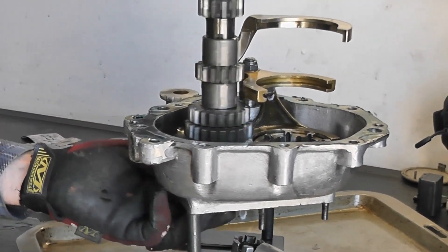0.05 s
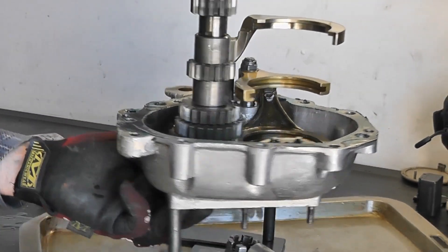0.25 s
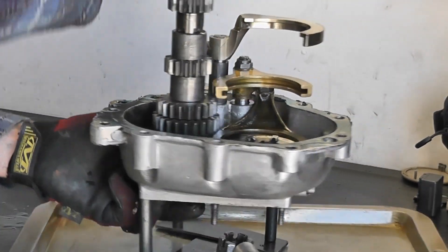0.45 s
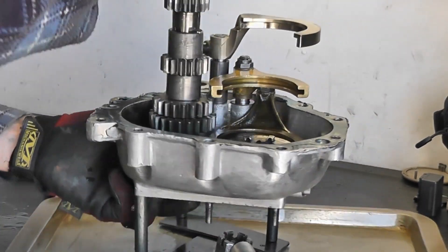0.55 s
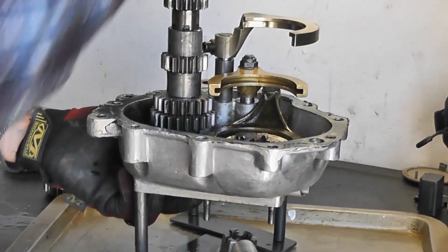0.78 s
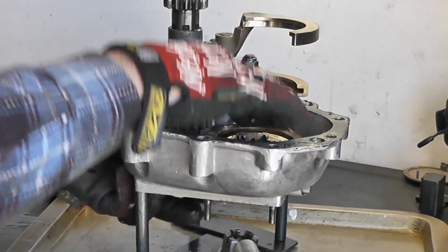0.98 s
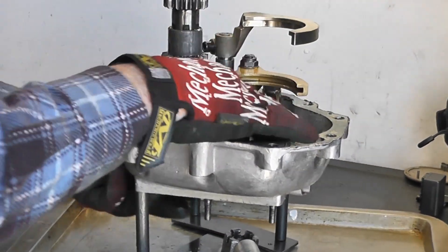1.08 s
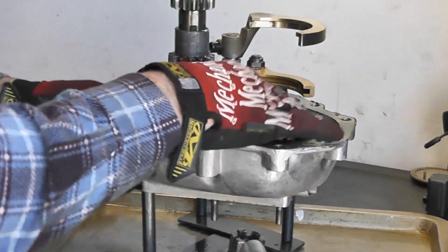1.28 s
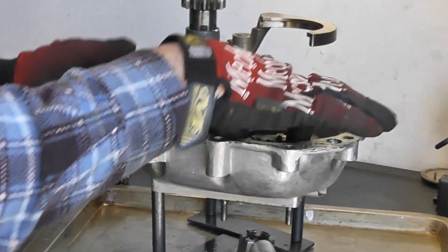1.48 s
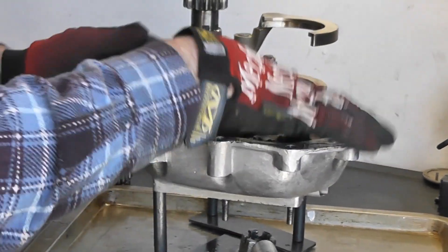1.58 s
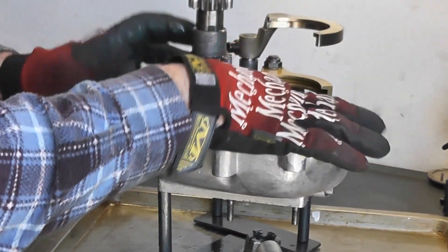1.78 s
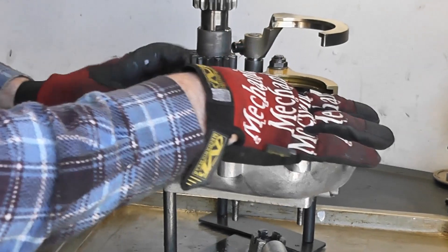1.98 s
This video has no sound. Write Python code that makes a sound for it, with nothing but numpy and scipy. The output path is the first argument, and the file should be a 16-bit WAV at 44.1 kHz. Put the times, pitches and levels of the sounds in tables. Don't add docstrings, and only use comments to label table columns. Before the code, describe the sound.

A steel gear scrapes along its shaft and knocks inside a hollow metal casing, then rattles

```python
import sys
import numpy as np
from scipy import signal
from scipy.fft import rfft, irfft
from scipy.io import wavfile

SR = 44100
rng = np.random.default_rng(int(sys.argv[2]) if len(sys.argv) > 2 else 0)


def boost(x):
    u = np.asarray(x, float) / 20
    return 10 ** u


def transcribe(signal):
    frames = np.atleast_2d(signal).T
    limited = np.clip(frames, -1, 1)
    pcm = np.round(limited * 32767).astype(np.int16)
    wavfile.write(sys.argv[1], SR, pcm)


N = 90404

# pitch_hz [Hz], level_db [dB], t60_s [s]
CASING_MODES = [(1017, 2, .12), (1120, 2, .12), (1162, -2, .09), (1295, -3, .07), (1432, 2, .08),
                (1740, 3, .07), (1785, 2, .06), (1968, 3, .05), (2015, 2, .05), (2085, -3, .05),
                (2180, -3, .05), (2452, -4, .05)]
# pitch_hz [Hz], level_db [dB], t60_s [s]
HELD_RIM_MODES = [(7576, 0, .048), (7620, -34, .15), (12280, -34, .14), (14230, -18, .07)]
# pitch_hz [Hz], level_db [dB], t60_s [s]
SEATED_RIM_MODES = [(7682, -9, .36), (7720, 0, .08), (7640, -4, .1), (8366, -16, .1), (12350, -20, 0.045),
                    (14330, -18, .05)]


def rms_one(x):
    return x / np.sqrt(np.mean(x ** 2) + 1e-20)


def butterworth(x, order, hz, kind="low"):
    return signal.sosfilt(signal.butter(order, hz, kind, fs=SR, output="sos"), x)


def at_hz(points, hz):
    point_hz, point_db = np.array(points).T
    return np.interp(np.log(hz), np.log(point_hz), point_db)


def colour(x, points):
    hz = np.maximum(np.arange(N // 2 + 1) * SR / N, 1)
    return irfft(rfft(x) * boost(at_hz(points, hz)), N)


def drift(hz):
    return rms_one(butterworth(rng.standard_normal(N + SR), 2, hz)[SR:])


def add(out, start_s, x):
    i = int(start_s * SR)
    out[i:i + len(x)] += x[:len(out) - i]


def ringing(modes, spread_db=0.):
    hz, db, t60 = np.transpose(modes)[:, :, None]
    t = np.arange(int(SR * np.clip(t60.max(), .02, .4))) / SR
    level = boost(db + spread_db * rng.standard_normal(hz.shape))
    decay = boost(-60 * t / np.maximum(t60, .003))
    return np.sum(level * np.sin(2 * np.pi * hz * t) * decay, axis=0)


def crowd(low_hz, high_hz, t60, centre_hz, octaves, skirt_db, count):
    skirt_db_per_octave = -24
    hz = low_hz * (high_hz / low_hz) ** ((np.arange(count) + rng.random(count)) / count)
    away = np.log2(hz / centre_hz)
    skirt = boost(skirt_db + skirt_db_per_octave * np.maximum(away, 0))
    share = np.exp(-.5 * (away / octaves) ** 2) + skirt
    decay_s = t60 * (hz / centre_hz) ** -.4 * rng.uniform(.6, 1.5, count)
    return np.c_[hz, 20 * np.log10(share), decay_s]


def rough_contact():
    contact_s, rise_s, first_touch_db = 0.0047, .0004, 8
    t = np.arange(SR // 50) / SR
    uneven_db = 4.1 * rng.standard_normal(len(t)) + first_touch_db * (t < 2 * rise_s)
    force = rng.standard_normal(len(t)) * np.exp(-t / contact_s)
    return force * boost(uneven_db) * (1 - np.exp(-t / rise_s))


def strike(start_s, level_db, modes, rough):
    if rough:
        x = signal.fftconvolve(rough_contact(), ringing(modes, spread_db=4.5))
    else:
        x = ringing(modes)
        x = x * (1 - np.exp(-np.arange(len(x)) / (0.00031 * SR)))
    out = np.zeros(N)
    add(out, start_s, boost(level_db) * x / np.sqrt(np.mean(x[:SR // 150] ** 2)))
    return out


def knocks(rows, rim):
    body_trim_db = [-13, -6.5, -1]
    clack_trim_db, casing_trim_db, rim_trim_db = body_trim_db
    hollow_db = -1
    out = np.zeros(N)
    for start_s, clack_db, clack_hz, casing_db, rim_db in rows:
        clack = crowd(1502, 15500, .03, clack_hz, 0.36, -15.5, count=90)
        hollow = crowd(850, 2800, .045, 1700, .5, -20, count=45) + [0, hollow_db, 0]
        out += strike(start_s, clack_db + clack_trim_db, clack, True)
        out += strike(start_s, casing_db + casing_trim_db, np.r_[CASING_MODES, hollow], True)
        out += strike(start_s, rim_db + rim_trim_db, rim, False)
    return out


def air():
    # pitch_hz [Hz], level_db [dB]
    hush_spectrum = [(15, -40), (35, -18), (64, -8.5), (100, -3), (486, -6.5), (1010, -13), (2600, -21.5),
                     (15700, -36.5)]
    # pitch_hz [Hz], likeness [0 to 1]
    likeness = [(25, .3), (60, .65), (150, .7), (600, 0.52), (5000, 0.9)]
    hush_db, swell_db = -53.5, .5
    mid, side = colour(rng.standard_normal((2, N)), hush_spectrum)
    share = [(hz, 10 * np.log10((1 - c) / (1 + c))) for hz, c in np.clip(likeness, .01, [SR, .98])]
    stereo = mid + colour(side, share) * [[1], [-1]]
    return boost(hush_db + swell_db * drift(1.3)) * stereo / np.std(mid)


def scrape():
    # start_s [s], level_db [dB], brightness_db [dB], casing_share_db [dB]
    slide = [(0.001, -60, 1, 0.5), (.07, -71, 3.5, -1.5), (0.17, -61, 5.5, 1.5), (.198, -49.5, 2, 1),
             (0.213, -38.5, 12, -5), (.25, -41.5, -0.5, -5), (.3, -37.5, 4, -4.5), (.4, -38.5, 2.5, -1),
             (.47, -45, 5.5, -1.5), (.505, -41, 3, -5), (.56, -46, 4.5, 2), (.68, -53.5, 7, 1),
             (.75, -58, 7.5, -1), (.8, -53, 8, 7.5), (.845, -59.5, 9, 8.5), (.89, -74, -2.5, 5),
             (.94, -72.5, 0.5, 3), (.96, -65.5, 10, 5), (1.06, -77.5, -1, -5)]
    # centre_s [s], half_length_s [s], level_db [dB]
    surges = [
        (.425, .007, 3),
        (.462, .007, 2.5),
        (.507, .006, 7),
        (.523, .004, 3),
        (.547, .009, 4.5),
        (.592, .005, 4),
        (.644, .009, 5),
        (.7, .008, 4),
    ]
    # pitch_hz [Hz], level_db [dB per Hz]
    friction_spectrum = [(200, -17.5), (400, -4), (650, -11.5), (1070, -4), (4570, -10), (6700, -17.5),
                         (10000, -16.5), (11500, -24)]
    # pitch_hz [Hz], width_hz [Hz], level_db [dB]
    resonances = [(1818, 220, -7), (4750, 1200, -1.5), (8190, 1200, -9)]
    grit_per_s, grit_spread_db, judder_db = 9000, 3, 1.2
    modes_db, scrape_db, resonance_gain_db = -11, 3.0, 11.0
    edge_share = 0.38

    s, *columns = np.transpose(slide)
    t = np.arange(N) / SR
    level_db, bright_db, casing_db = [np.interp(t, s, c) for c in columns]
    surge_db = sum(db * np.exp(-.5 * ((t - at) / half) ** 2) for at, half, db in surges)
    gate = np.clip((t - s[0]) * 100, 0, 1) * np.clip((s[-1] - t) / 0.041, 0, 1)

    hits = rng.random(N) < grit_per_s / SR
    size = boost(grit_spread_db * np.minimum(rng.exponential(1, N), 4))
    grit = hits * size * rng.choice([-1, 1], N)
    grit = rms_one(grit) * boost(level_db + judder_db * drift(40)) * gate
    grit_rms = np.sqrt(np.mean(grit ** 2))

    hiss = colour(grit, friction_spectrum)
    for hz, width, db in resonances:
        peak = signal.lfilter(*signal.iirpeak(hz, hz / width, SR), hiss)
        hiss = hiss + boost(db + resonance_gain_db) * peak
    modes = np.r_[CASING_MODES, crowd(2400, 9500, .04, 4600, .3, -12, count=40)]
    rung = signal.fftconvolve(grit, ringing(modes))[:N]
    body = rms_one(hiss) + boost(modes_db) * rms_one(rung)

    low = butterworth(body, 4, 2600)
    mid = butterworth(body, 3, [2600, 6800], "band")
    high = butterworth(body, 4, 6800, "high")
    low_db = casing_db + edge_share * surge_db + judder_db * drift(25)
    high_db = bright_db + edge_share * surge_db + judder_db * drift(24.8)
    return boost(scrape_db) * grit_rms * (boost(surge_db) * mid + boost(low_db) * low + boost(high_db) * high)


def slide_knocks():
    rows = [(0.0755, -36, 3170, -36.5, -71), (0.0955, -40, 3840, -43, -66), (0.1372, -57, 3430, -39.5, -75),
            (0.1505, -39, 4770, -38, -69.5), (0.2085, -24.5, 4080, -53, -55), (0.3598, -12, 4130, -20, -48),
            (0.3654, -20.5, 3740, -26, -34), (0.3811, -18.5, 2440, -30.5, -38),
            (0.3931, -23.5, 4300, -27, -51), (0.4109, -48, 4340, -29.5, -49), (0.7105, -44, 4180, -36, -64),
            (0.7205, -32, 4050, -32, -65), (0.7597, -35, 3030, -31.5, -68), (0.7649, -40, 2500, -31.5, -60),
            (0.7936, -33, 4500, -34, -52.5), (0.9475, -45, 5140, -50.5, -64)]
    return knocks(rows, HELD_RIM_MODES)


def selector_fork():
    # start_s [s], level_db [dB]
    hits = [
        (.078, -51.5),
        (1.2, -60.5),
        (1.219, -47.5),
        (1.24, -38.5),
        (1.563, -60),
    ]
    # pitch_hz [Hz], level_db [dB], t60_s [s]
    fork_modes = [(2880, 0, .045), (2950, -6, .17), (2860, -10, .12), (3510, -3, 0.023), (3704, -10, .08)]
    return sum(strike(start_s, level_db, fork_modes, False) for start_s, level_db in hits)


def single_modes():
    # start_s [s], level_db [dB], pitch_hz [Hz], t60_s [s]
    bump_rows = [
        (.139, -35, 350, 0.13),
        (.155, -35.5, 443, 0.075),
        (.33, -36.5, 269, 0.13),
        (.72, -36.5, 514, 0.078),
        (1.562, -36.5, 641.5, 0.07),
        (1.566, -34.5, 507, 0.082),
        (.98, -42, 497, 0.075),
    ]
    # start_s [s], level_db [dB], pitch_hz [Hz], t60_s [s]
    part_rows = [(.368, -28.5, 1120, 0.13), (.383, -29, 1100, 0.11), (.7605, -29, 1985, 0.046),
                 (0.83, -34, 2068, .035), (1.2188, -22.5, 3270, .022), (2.0115, -30.5, 1020, 0.092),
                 (.2645, -23.5, 1800, 0.041), (.3605, -21.5, 1985, 0.033), (.381, -27, 2000, 0.03),
                 (1.2195, -32, 1700, 0.042), (1.561, -34.5, 3540, 0.028), (.202, -35.5, 1600, 0.027),
                 (.152, -45, 4500, 0.059),
                 (0.27, -13.5, 8700, .009), (0.264, -15, 9000, 0.011), (0.36, -20.5, 4090, 0.035),
                 (0.37, -30.5, 4260, 0.059), (0.37, -26, 1380, 0.055), (0.36, -19.5, 1830, 0.032),
                 (.795, -39.5, 7850, 0.075), (.795, -40, 7200, .03), (0.79, -32, 2880, .02),
                 (1.1, -56, 10800, .005), (.796, -48, 13000, .03), (.14, -41.5, 1000, 0.054),
                 (1.351, -50.5, 9400, 0.046), (1.351, -39.5, 3700, 0.037), (1.36, -36, 1700, .05),
                 (1.816, -50.5, 9970, 0.067), (1.836, -46, 6830, 0.091), (2.012, -38.5, 2476, .04),
                 (2.016, -43, 1793, 0.08), (.69, -49, 6200, 0.12), (0.62, -46, 4300, .04)]
    out = np.zeros(N)
    for start_s, level_db, hz, t60 in bump_rows + part_rows:
        x = ringing([(hz, 0, t60)])
        rise = 1 - np.exp(-np.arange(len(x)) * hz / SR)
        add(out, start_s, boost(level_db) * x * rise)
    return out


def shoulder_stop():
    rows = [
        (0.2643, -17, 8900, -40.5, -53.5),
        (0.2659, -15.5, 5010, -39, -13.5),
    ]
    return knocks(rows, HELD_RIM_MODES)


def rubs():
    rows = [
        (0.336, 0.019, -34),
        (1.249, 0.014, -31),
        (1.274, 0.015, -41.5),
        (1.292, 0.031, -42),
        (1.327, 0.0086, -42),
        (1.838, .012, -53),
    ]
    stop_s, band_hz = 0.0078, 500
    out = np.zeros(N)
    for start_s, length_s, level_db in rows:
        n = int(length_s * SR)
        friction = rng.standard_normal(n + SR // 20)
        x = signal.fftconvolve(friction, ringing(HELD_RIM_MODES[:2]))[SR // 20:]
        k = np.arange(len(x))
        swell = np.where(k < n, k / n, np.exp(-(k - n) / (stop_s * SR)))
        add(out, start_s, boost(level_db) * x / np.sqrt(np.mean(x[:n] ** 2)) * swell)
    return butterworth(out, 2, HELD_RIM_MODES[0][0] + band_hz * np.r_[-1, 1], "band")


def rattle():
    rows = [
        (1.2013, -46.5, 3680, -45, -63.5),
        (1.2186, -27, 4700, -34, -40.5),
        (1.2372, -21.5, 4040, -33, -37),
        (1.2418, -27, 4520, -35, -37),
        (1.3046, -35, 4400, -40, -58),
        (1.3124, -30.5, 4260, -36.5, -49),
        (1.3508, -35, 3950, -35.5, -59),
    ]
    # pitch_hz [Hz], level_db [dB], t60_s [s]
    loose_rim_modes = [(7585, -1, 0.062), (7615, 0, 0.13), (7710, -8, 0.064), (12300, -22, 0.12),
                       (13720, -17, .09), (14240, -19, .08)]
    return knocks(rows, loose_rim_modes)


def second_hub():
    hits = [
        (1.305, -43.5),
        (1.334, -47.5),
        (1.351, -47),
        (1.561, -46.5),
        (1.8172, -42.5),
        (1.835, -58),
    ]
    # pitch_hz [Hz], level_db [dB], t60_s [s]
    hub_modes = [(5927, 0, .035), (5945, -13, .22), (5985, -14, .18), (6056, -7, .06), (6920, -12, .05)]
    return sum(strike(start_s, level_db, hub_modes, False) for start_s, level_db in hits)


def seating_taps():
    rows = [
        (1.5599, -25, 3960, -38.5, -37.5),
        (1.5645, -27.5, 3600, -28.5, -57),
    ]
    return knocks(rows, SEATED_RIM_MODES)


def damped_taps():
    rows = [
        (1.8125, -27.5, 4410, -43, -52),
        (1.8174, -27, 6212, -33.5, -42),
        (1.8225, -31.5, 5000, -42, -42.5),
        (1.8352, -42, 6900, -54, -53),
        (2.0108, -33.5, 3540, -30, -61.5),
        (2.0175, -38.5, 3940, -33.5, -56),
        (2.0424, -41, 3920, -38, -71),
    ]
    finger_share, glove_cut_hz = .4, 10500
    rim = np.multiply(SEATED_RIM_MODES, [1, 1, finger_share])
    return butterworth(knocks(rows, rim), 6, glove_cut_hz)


def workshop(x):
    t60_s, wall_cut_hz, room_db, side_db = 0.37, 3850, -13.5, -7
    t = np.arange(int(.6 * SR)) / SR
    mid, side = butterworth(rng.standard_normal((2, len(t))), 2, wall_cut_hz)
    tail = mid + boost(side_db) * side * [[1], [-1]]
    tail = tail * boost(-60 * t / t60_s) * np.clip((t - .004) / 0.0033, 0, 1)
    tail = tail / np.sqrt(np.mean(np.sum(tail ** 2, axis=1)))
    return boost(room_db) * signal.fftconvolve(x[None], tail)[:, :N]


def scene():
    pan_db, low_cut_hz = -.3, 850
    port_lag_s, port_hz, port_db = .0012, 8500, -18
    impacts = slide_knocks() + shoulder_stop() + rattle() + seating_taps() + damped_taps()
    impacts = impacts + rubs() + second_hub() + selector_fork()
    box = butterworth(impacts, 4, low_cut_hz, "high") + single_modes()
    box = butterworth(box + scrape(), 2, 200, "high")
    uneven = np.zeros(N)
    add(uneven, port_lag_s, boost(port_db) * butterworth(box, 4, port_hz, "high"))
    direct = box * boost([[pan_db], [-pan_db]]) + uneven * [[1], [-1]]
    return direct + workshop(box) + air()


def low_pass(x):
    return signal.sosfilt(signal.butter(12, 15890, fs=SR, output="sos"), x)


def record(dry):
    mic_roll_hz, rumble_cut_hz, top_cut_hz = 14000, 62, 16300
    mix = butterworth(dry, 2, mic_roll_hz)
    mix = butterworth(mix, 2, rumble_cut_hz, "high")
    mix = signal.sosfilt(signal.cheby2(12, 60, top_cut_hz, fs=SR, output="sos"), mix)
    return low_pass(mix)


dry = scene()
out = record(dry)
transcribe(out)
```